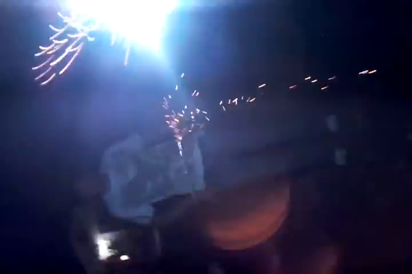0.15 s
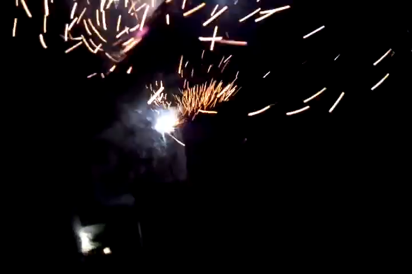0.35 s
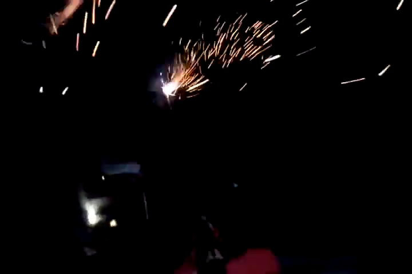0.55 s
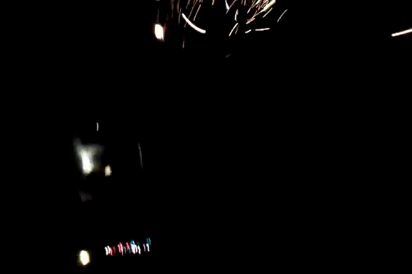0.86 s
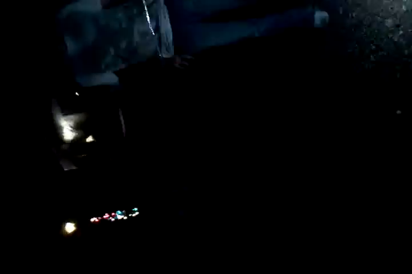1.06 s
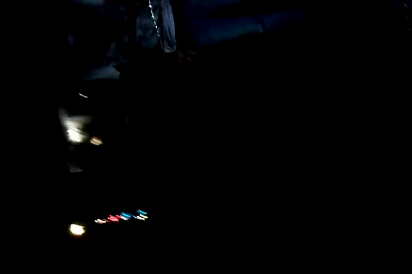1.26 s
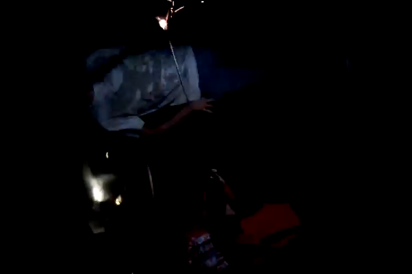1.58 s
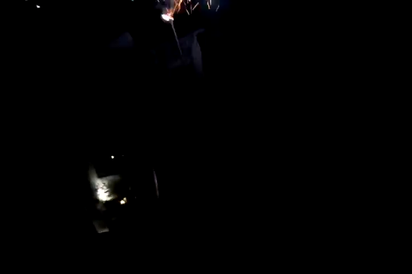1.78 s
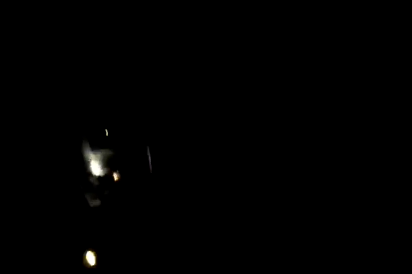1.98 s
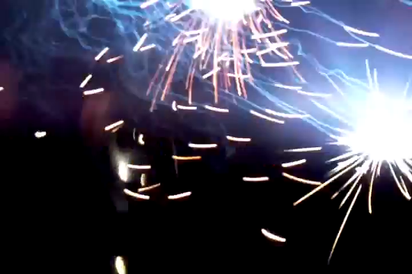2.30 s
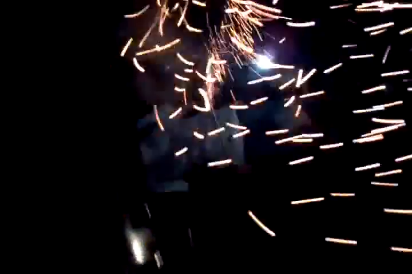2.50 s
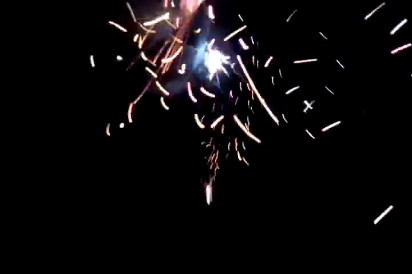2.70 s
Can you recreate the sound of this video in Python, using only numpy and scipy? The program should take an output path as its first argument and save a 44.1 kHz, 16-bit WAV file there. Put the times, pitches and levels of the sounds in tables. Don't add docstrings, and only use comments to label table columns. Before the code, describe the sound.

Sharp firework pops snap at random, some much louder, with brief fizzes, in an open yard

```python
import sys
import numpy as np
from scipy import signal
from scipy.fft import rfft, irfft, next_fast_len
from scipy.io import wavfile
from scipy.ndimage import map_coordinates

SR = 44100
rng = np.random.default_rng(int(sys.argv[2]) if len(sys.argv) > 2 else 0)


def volts(x):
    e = np.asarray(x, float) / 20
    return 10 ** e


def log_audio(samples):
    frames = np.atleast_2d(samples).T
    limited = np.clip(frames, -1, 1)
    pcm = np.round(limited * 32767).astype(np.int16)
    wavfile.write(sys.argv[1], SR, pcm)


N = 125685

# [f/Hz, level/dB]
SCATTER_COLOUR = [(180, -12.5), (300, -1.5), (506, -6.5), (2730, -3), (4910, -12.5), (6800, -9.5),
                  (8840, -36.5), (15000, -120)]


def unit(x):
    return x / np.sqrt(np.mean(x ** 2) + 1e-20)


def along(points, hz):
    f, v = np.transpose(points)
    return np.interp(np.log(hz + 1), np.log(f + 1), v)


def coloured(x, points):
    gain = volts(along(points, np.fft.rfftfreq(4096, 1 / SR)))
    cepstrum = irfft(np.log(np.maximum(gain, 1e-4)))
    cepstrum[1:2048] *= 2
    cepstrum[2049:] = 0
    response = irfft(np.exp(rfft(cepstrum)))
    return signal.fftconvolve(x, response)[:len(x)]


def lay(out, s, sound):
    out[round(s * SR):][:len(sound)] += sound


def snaps(per_s, spread_db):
    chance, size = rng.random((2, N))
    ticks = (chance < per_s / SR) * volts(-spread_db * np.log(size + 0.018))
    decay = volts(-60 * np.arange(600) / SR / 0.006)
    puffs = signal.fftconvolve(ticks, decay)[:N]
    return unit(coloured(puffs * rng.standard_normal(N), SCATTER_COLOUR))


def sizzle():
    # [f/Hz, level/dB]
    air_colour = [(18, -54), (30, 26.5), (277, 4), (399, -3.5), (1160, 1.5), (3070, 2), (6800, -7.5),
                  (8840, -27), (15000, -120)]
    sizzle_db, snap_db, hiss_db = -50.5, -6, -5
    flutter = map_coordinates(rng.standard_normal(N // 100), [np.arange(N) * 70 / SR])
    hiss = unit(coloured(rng.standard_normal(N), air_colour)) * volts(3.9 * flutter)
    sparks = snaps(per_s=1500, spread_db=5)
    return volts(sizzle_db) * (volts(snap_db) * sparks + volts(hiss_db) * hiss)


def flares():
    # [start/s, length/s, level/dB, tilt to the highs/dB, lift near 2.6 kHz/dB]
    fizzing_stars = [(0.258, 0.064, -38, -0.5, 0), (0.327, 0.05, -36.5, -2, 3.5),
                     (0.442, 0.046, -44, 0.5, -3.5), (0.558, 0.088, -43, 0.5, 3.5),
                     (0.684, 0.15, -43.5, -1, -0.5), (0.829, 0.024, -36.5, -0.5, -1.5),
                     (0.86, 0.032, -35, -2, -1.5), (0.916, 0.018, -50.5, 11.5, -6.5),
                     (1.106, 0.054, -45.5, -4, 11.5), (1.164, 0.037, -49, -0.5, 6),
                     (1.357, 0.059, -45, -3, 0), (1.471, 0.042, -41.5, 2.5, 1), (1.645, 0.3, -51, 4.5, 2.5),
                     (2.027, 0.049, -58, -13.5, -2.5), (2.127, 0.046, -44.5, 1.5, 0.5),
                     (2.19, 0.071, -43, 3.5, -4.5), (2.346, 0.022, -46.5, -4.5, 4),
                     (2.63, 0.13, -46, 3.5, -1)]
    rise_s, fall_s, sag_db, rumble_db = 0.012, 0.0062, -5.5, -11
    out, t = np.zeros(N + SR), np.arange(SR // 2) / SR
    rumble = unit(coloured(rng.standard_normal(N), [(60, -15.0), (150, 3.5), (900, -15.0)]))
    rush = snaps(per_s=2000, spread_db=0.63) + volts(rumble_db) * rumble
    rush = np.pad(rush, (0, SR))
    for s, length, db, tilt_db, fizz_db in fizzing_stars:
        edge = np.clip(np.minimum(t / rise_s, (length - t) / fall_s + 1), 0, 1)
        gain = edge * volts(db + sag_db * np.clip(t / length, 0, 2))
        colour = [(800, -tilt_db), (2600, fizz_db), (6000, tilt_db)]
        lay(out, s, coloured(gain * rush[round(s * SR):][:len(t)], colour))
    return out[:N]


def body_rings():
    # [t/s, f/Hz, level/dB]
    rings = [(0.048, 335, -33.5), (0.209, 105, -32.5), (.267, 760, -29), (.285, 790, -26), (0.334, 97, -25),
             (.573, 795, -31), (1.978, 677, -36), (1.979, 354, -32), (2.153, 100, -25), (2.278, 990, -30.5),
             (2.277, 600, -35), (2.382, 435, -22), (2.747, 100, -36)]
    t60_s = 0.03
    out, t = np.zeros(N + SR), np.arange(SR // 5) / SR
    for s, hz, db in rings:
        lay(out, s, -volts(db - 60 * t / t60_s) * np.sin(2 * np.pi * hz * t))
    return out[:N]


def yard(size):
    # [f/Hz, t60/s]
    yard_t60 = [(150, 0.17), (2000, 0.51), (5000, 0.81)]
    hz, t, z = signal.stft(rng.standard_normal(size), SR, nperseg=256)
    fade = volts(-60 * t / along(yard_t60, hz)[:, None])
    tail = signal.istft(z * fade, SR, nperseg=256)[1]
    return tail / np.linalg.norm(tail)


def blast(t, width_s):
    u = t / width_s
    return (u - 1) * np.exp(-u)


def blast_front(t):
    # [f/Hz, level/dB]
    front_colour = [(100, -26), (700, -5), (2800, 3), (6500, 1), (9000, -20)]
    rebound_s, rebound_db = 0.00021, -11
    front = coloured(blast(t, width_s=0.00014), front_colour)
    front = front / abs(front).max()
    return front - volts(rebound_db) * np.roll(front, round(rebound_s * SR))


def front_copies(front):
    mean_delay_s = 0.002
    delay, size = rng.random((2, 5))
    copies = np.zeros(len(front))
    for d, gain in zip(delay, np.cos(7 * size)):
        copies += gain * np.roll(front, round(mean_delay_s * SR * 2 * d))
    return copies


def pops():
    # [t/s, peak level/dB, push over the front/dB, spray over the front/dB]
    bursting_stars = [(0.0223, -32, 2, -0.5), (0.05, -33, 2.5, 4), (0.2077, -35, 5.5, 5.5),
                      (0.2666, -33, 4, 6.5), (0.2853, -30.5, 12, -6), (0.3073, -35, -15, -4.5),
                      (0.329, -30, -4.5, -0.5), (0.3355, -35, -10.5, -4), (0.4528, -34.5, 6, 0.5),
                      (0.5726, -11, -5, -14.5), (0.6095, -31, -12, -5), (0.7233, -26, 1.5, -7.5),
                      (0.7516, -31.5, 2.5, -1.5), (0.7959, -30, -13, -5.5), (0.8151, -32, -21.5, 7),
                      (0.8242, -22, 8.5, 1), (0.8599, -27.5, -11.5, -4.5), (0.8822, -32.5, 10.5, 0),
                      (0.9102, -25, 2.5, -0.5), (0.9545, -24.5, -13, -13),
                      (1.018, -23.5, -24.5, -13), (1.0891, -27, -9.5, -3), (1.1067, -32, 8.5, 0),
                     (1.1237, -34.5, -14, 0), (1.152, -35.5, 9, -2), (1.349, -22.5, -4, -10),
                     (1.414, -42.5, 13, -13), (1.4567, -32, -7.5, -10.5), (1.4802, -25, -8, -8),
                     (1.4913, -28, 1.5, -2), (1.5296, -40, 3, 4.5), (1.5448, -37.5, 8.5, 1),
                     (1.682, -30, -10.5, -13.5), (1.7273, -22, -18.5, -15.5), (1.7922, -28, -3, -6.5),
                     (1.8243, -25.5, -19, -11.5), (1.8501, -35, 6.5, 2.5), (1.9182, -30, -21.5, -5.5),
                     (1.9458, -31, -10, -1), (1.9782, -16.5, -4.5, -14),
                      (2.0974, -29.5, -6.5, -14), (2.1514, -30, -1, 5), (2.171, -27, 4, -1.5),
                    (2.2067, -25.5, -13.5, -19), (2.2149, -15, -5.5, -16.5), (2.2395, -30.5, -5, 5),
                    (2.2435, -24.5, 8, -4.5), (2.2776, -17.5, -2.5, -8.5), (2.309, -29.5, -27, -6.5),
                    (2.3766, -27.5, 6, -9.5), (2.381, -16, -1, -2), (2.4318, -26, -7.5, -8.5),
                    (2.4765, -25.5, -17, -8), (2.5251, -39, -9, 0), (2.534, -25, -18, -9.5),
                    (2.6067, -30.5, -7.5, -4), (2.6304, -32, -0.5, -10), (2.6378, -15.5, -3.5, -18.5),
                    (2.7477, -28, -9.5, -2), (2.7835, -31, -8, -7),
                      (0.1336, -47.5, -25.5, -4), (0.2822, -27, -5, -13), (0.407, -39.5, -13, -6.5),
                   (0.4246, -35.5, -23, -8.5), (0.5887, -29, -3, -1.5), (0.6744, -36, -5, -6),
                   (0.6905, -42.5, 9, -18.5), (0.8976, -29, -3, -8), (0.9954, -39.5, -30, -8.5),
                   (1.165, -41.5, -26, 5), (1.1796, -36, -1.5, -5), (1.4386, -36, -29, -3.5),
                   (1.699, -33, 3.5, -10.5), (1.888, -37, -16.5, -1.5), (2.0414, -43.5, 7.5, -16.5),
                   (2.14, -29.5, -6, -6.5), (2.265, -39, -10, -0.5), (2.2825, -32, -11, -20),
                   (2.403, -55, -20, -23), (2.447, -37, -12.5, -2), (2.504, -39, 0, -7),
                   (2.5718, -43.5, -9, -3.5), (2.7287, -38, -19.5, -11)]
    push_s, push_varies = 0.00097, 0.2
    spray_t60_s, spray_rise_s = 0.032, 0.00075
    copies_db, yard_db = -10.5, -17
    out, t = np.zeros(N + SR), np.arange(SR // 12) / SR
    front = blast_front(t)
    for s, db, push_db, spray_db in bursting_stars:
        u = t / (push_s * np.exp(push_varies * rng.standard_normal()))
        push = -np.cos(u) * np.exp(-u / 1.11)
        noise = unit(coloured(rng.standard_normal(len(t)), SCATTER_COLOUR))
        spray = noise * volts(-60 * t / spray_t60_s) * (1 - np.exp(-t / spray_rise_s))
        direct = front - volts(copies_db) * front_copies(front)
        pop = volts(db) * (direct + volts(push_db) * push + volts(spray_db) * spray)
        echo = volts(yard_db) * signal.fftconvolve(np.pad(pop, (300, 0)), yard(size=SR // 4))
        lay(out, s, pop)
        lay(out, s, echo)
    return out[:N]


def scene():
    return (pops() + body_rings() + sizzle() + flares())[None]


def whistles():
    # [middle/s, level/dB, f/Hz]
    stray_whistles = [(0.023, -57, 7820), (0.054, -51, 7100), (0.13, -63.5, 7660), (0.221, -50.5, 7180),
                      (0.268, -41.5, 7730), (0.338, -38.5, 6960), (0.373, -52, 7760), (0.405, -50, 7090),
                      (0.452, -50.5, 7650), (0.476, -50, 7330), (0.505, -64, 7730), (0.572, -45.5, 7580),
                      (0.582, -56.5, 7700), (0.627, -67, 7540), (0.637, -60.5, 7900), (0.676, -58, 7550),
                      (0.723, -51, 7250), (0.766, -47, 7270), (0.82, -43.5, 7150), (0.83, -41, 7130),
                      (0.893, -52, 6950), (0.911, -49, 7300), (0.957, -39.5, 7100), (1.02, -47.5, 7530),
                      (1.101, -51, 7400), (1.114, -50, 7060), (1.131, -55.5, 7810), (1.182, -59.5, 7200),
                      (1.25, -63, 6900), (1.351, -54.5, 7600),
                      (1.397, -64, 7800), (1.486, -50.5, 7660), (1.532, -51, 7330), (1.564, -55.5, 7140),
                     (1.68, -52.5, 7850), (1.7, -52, 7840), (1.727, -46, 7360), (1.774, -55.5, 7800),
                     (1.821, -42.5, 7260), (1.922, -52.5, 7600), (1.98, -46, 7160), (2.045, -57, 7330),
                     (2.1, -51.5, 7450), (2.159, -50, 7820), (2.175, -46, 6930), (2.244, -39.5, 7170),
                     (2.277, -33.5, 7080), (2.381, -46.5, 6760), (2.433, -42, 7300), (2.476, -45.5, 7540),
                     (2.535, -45, 7270), (2.638, -37.5, 7760), (2.654, -57, 7070), (2.748, -42.5, 7120),
                     (2.787, -46, 7200)]
    length_s, spacing_hz = 0.016, 245
    near_db, far_db, rasp_db = -5.5, -17, -30
    out, t = np.zeros(N + SR), np.arange(round(length_s * SR)) / SR
    rasp = unit(coloured(rng.standard_normal(N + SR), [(6700, -80), (7000, 0), (8600, -6), (9000, -80)]))
    swell = np.sin(np.pi * t / length_s)
    for s, db, hz in stray_whistles:
        near, far = hz + spacing_hz * rng.integers([1, 3], [3, 7])
        pitch = np.minimum([[hz], [near], [far]], 8850)
        phase = rng.random(3)[:, None]
        tones = np.sin(2 * np.pi * (pitch * t + phase))
        chord = volts(np.array([0, near_db, far_db])) @ tones
        chord = chord + volts(rasp_db) * rasp[round(s * SR):][:len(t)]
        lay(out, s - length_s / 2, volts(db + 2.5) * chord * swell)
    return out[:N]


def band_limit(x):
    low_hz, top_hz = 105, 6820
    m = next_fast_len(N + SR // 4)
    hz = np.fft.rfftfreq(m, 1 / SR)
    band = (hz < top_hz) * (1j * hz / (low_hz + 1j * hz)) ** 2
    return irfft(rfft(x, m) * band, m)[:, :N]


def dropouts(x):
    # [start/s, length/s, from f/Hz, to f/Hz]
    silenced = [
        (.243, .011, 2200, 5400),
        (.243, .011, 500, 1300),
        (1.31, .03, 5800, 9000),
        (.084, .025, 5900, 9000),
        (2.324, .01, 2700, 4300),
        (2.333, .017, 2200, 9000),
        (2.325, .022, 700, 1300),
        (2.335, .017, 350, 700),
        (2.338, .011, 1500, 2000),
        (2.35, .022, 5400, 9000),
    ]
    hz, t, z = signal.stft(x, SR, nperseg=256, noverlap=224)
    for s, length, low_hz, high_hz in silenced:
        in_band = (hz[:, None] > low_hz) & (hz[:, None] < high_hz)
        z = z * ~(in_band & (t > s) & (t < s + length))
    return signal.istft(z, SR, nperseg=256, noverlap=224)[1][:, :N]


def roll_off(x):
    return signal.sosfilt(signal.butter(12, 9070, fs=SR, output="sos"), x)


def record(dry):
    # [f/Hz, level/dB]
    mic_colour = [(50, -0.5), (120, 0.5), (250, 0), (470, -3.5), (760, 0), (1400, -3), (2700, -1),
                  (5000, 0.5)]
    limit = 0.25
    limited = dry / (1 + abs(dry / limit) ** 4) ** (1 / 4)
    heard = coloured(limited[0], mic_colour)[None]
    kept = dropouts(band_limit(heard))
    return roll_off(kept + whistles())


dry = scene()
out = record(dry)
log_audio(out)
```